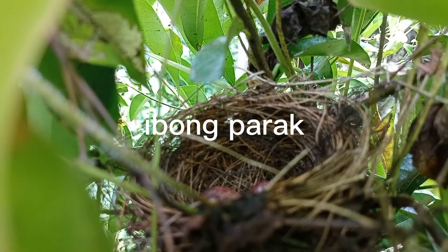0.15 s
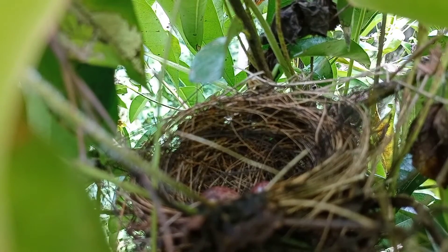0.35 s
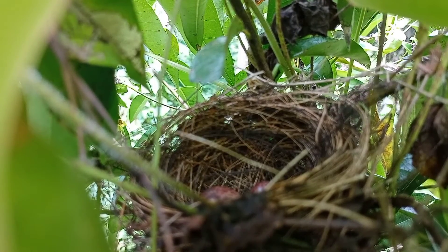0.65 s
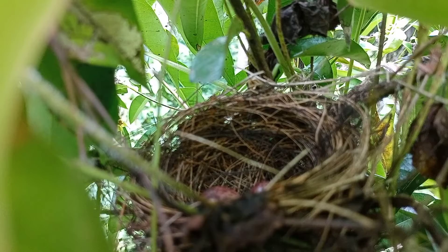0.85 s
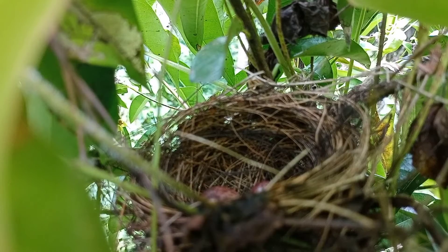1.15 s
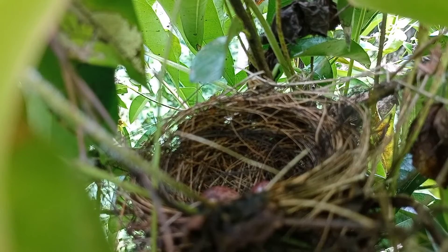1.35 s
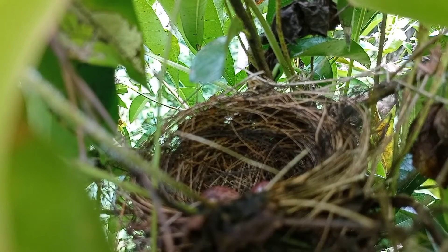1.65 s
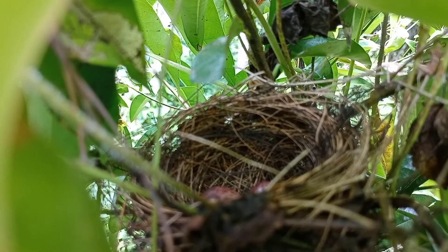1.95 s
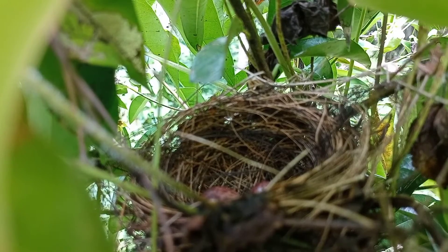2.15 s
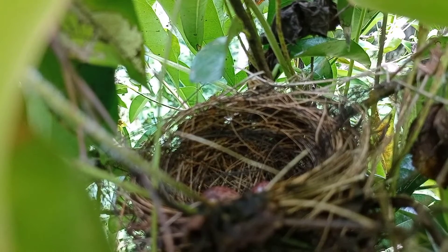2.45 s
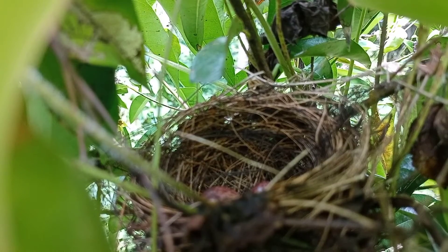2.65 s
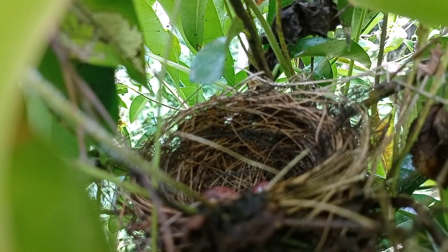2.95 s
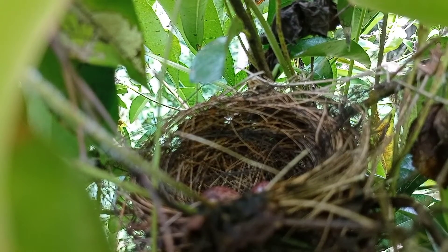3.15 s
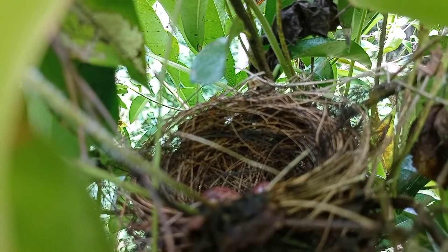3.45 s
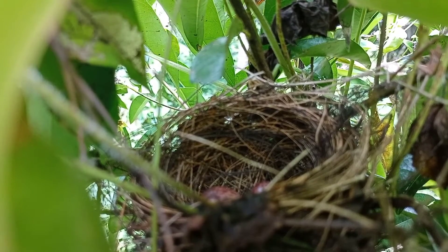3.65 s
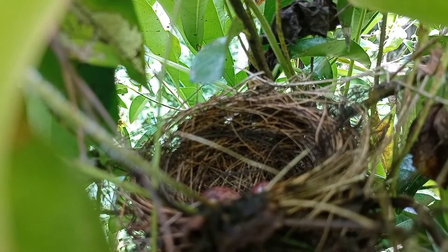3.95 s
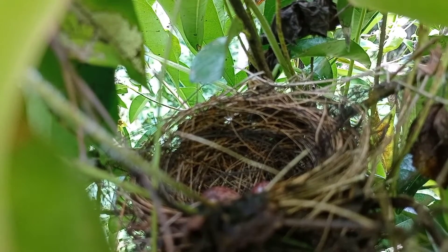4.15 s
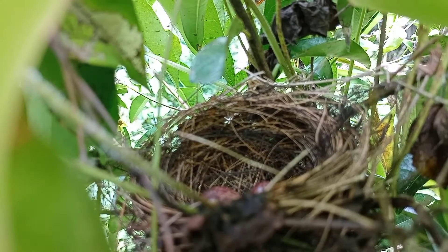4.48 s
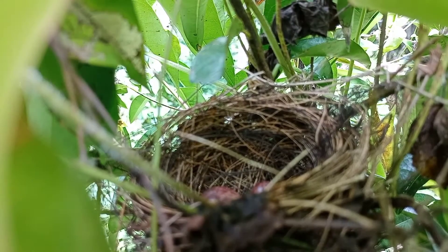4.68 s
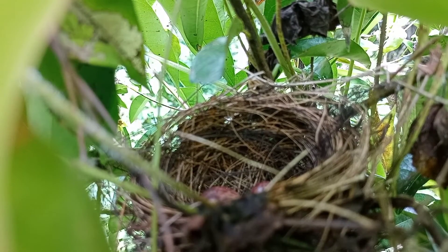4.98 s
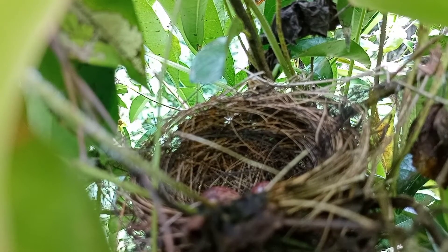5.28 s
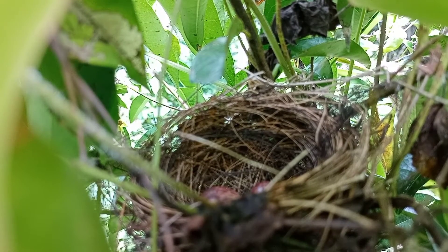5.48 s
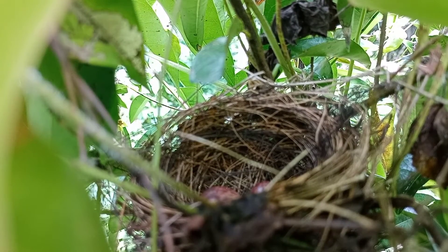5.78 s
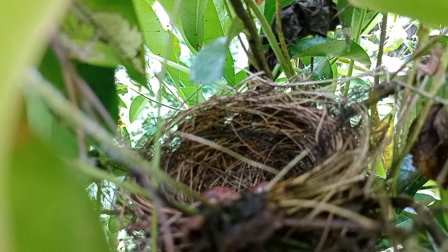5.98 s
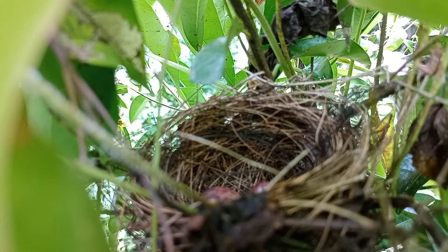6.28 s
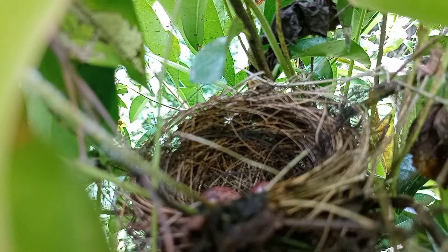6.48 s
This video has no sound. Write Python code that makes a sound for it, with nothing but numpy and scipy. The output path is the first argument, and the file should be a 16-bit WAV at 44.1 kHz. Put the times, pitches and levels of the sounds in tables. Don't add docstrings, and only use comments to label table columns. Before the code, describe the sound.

Close microphone among foliage, over a very quiet bed of distant traffic hum, airy leaf hiss and thin insect noise. Raspy bird clicks come patchily, fade, then build into rapid scolding. Leaves brush softly and twigs tick; one hard snap with a low bump follows. The chatter resumes strong and steady to the end, its tone shifting as the head turns, with a final small tick.

```python
import sys
import numpy as np
from scipy import signal
from scipy.fft import rfft, irfft, next_fast_len
from scipy.io import wavfile
from scipy.ndimage import uniform_filter1d

SR = 44100
rng = np.random.default_rng(int(sys.argv[2]) if len(sys.argv) > 2 else 0)


def magnitude_from_level(level_db):
    exponent = np.asarray(level_db, float) / 20
    return 10 ** exponent


def inscribe(sig):
    pcm = np.round(np.clip(np.atleast_2d(sig).T, -1, 1) * 32767)
    wavfile.write(sys.argv[1], SR, pcm.astype(np.int16))


N = 291942

# (f/Hz, level per Hz/dB)
BUSH_SPECTRUM = [(30, -12), (90, -13.5), (150, -1.5), (270, -14), (540, -13), (700, -19), (3300, -22.5),
                 (4800, -34), (7700, -40), (9000, -21), (10200, -43.5), (11300, -37.5), (12300, -52),
                 (15300, -40)]
BUSH_DB = -60.5
# (t/s, early effort/dB, late effort/dB, start pitch/Hz)
FAR_NOTES = [(-.05, -26, -27, 850), (.038, -29, -34, 786), (.112, -34, -40, 816), (0.19, -35.5, -38, 1096),
             (.301, -34, -33, 1100), (.41, -34, -36, 835), (.499, -32.5, -31.5, 995), (.612, -28, -35, 820),
             (.893, -31.5, -32.5, 769), (1.267, -36.5, -30.5, 760), (1.357, -31.5, -37.5, 779),
             (1.503, -42.5, -41, 912), (1.701, -43.5, -41.5, 1099), (1.794, -43.5, -42.5, 897),
             (1.953, -48.5, -40.5, 797), (2.069, -29, -31, 740), (2.267, -31.5, -33, 760),
             (2.431, -24.5, -28, 802), (2.51, -24, -28.5, 805), (2.591, -22, -18, 866),
             (2.691, -16, -17, 943), (2.777, -20.5, -23.5, 923), (2.851, -20, -21, 981),
             (2.943, -25, -22.5, 1063), (3.033, -22.5, -28, 1020), (3.141, -31.5, -29, 955),
             (3.243, -29.5, -28, 996), (3.333, -26, -28, 1034), (3.435, -26, -29, 1000)]
# (t/s, early effort/dB, late effort/dB, start pitch/Hz)
NEAR_NOTES = [(3.58, -25, -22, 1080), (3.671, -21.5, -20.5, 1000), (3.767, -17.5, -21, 1000),
              (3.848, -21, -17.5, 943), (3.986, -20.5, -19.5, 1050), (4.136, -22, -22, 975),
              (4.228, -21.5, -19.5, 891), (4.305, -22.5, -19.5, 1026), (4.501, -23.5, -21.5, 902),
              (4.685, -21.5, -20.5, 1020), (4.813, -20, -20.5, 989), (4.909, -19, -17.5, 960),
              (5.004, -19, -18, 1000), (5.134, -19.5, -13.5, 1013), (5.231, -15.5, -19, 1020),
              (5.318, -19, -15, 979), (5.446, -19, -19, 1003), (5.545, -18, -20, 980),
              (5.642, -20.5, -16.5, 894), (5.845, -20.5, -16, 940), (5.932, -18, -18, 981),
              (6.025, -18, -15.5, 1022), (6.113, -16.5, -17.5, 980), (6.219, -17, -18, 992),
              (6.307, -17, -18.5, 939)]
NOTE_S, TOP_HZ = 0.06, 1203
HOP_S = 3.52
# (t/s, length/s)
ODD_LENGTHS = [
    (.038, .056),
    (.114, 0.047),
    (1.503, 0.075),
    (1.953, .074),
    (2.591, .068),
]
# (t/s, length/s, start f/Hz, peak f/Hz, end f/Hz)
CLEAR_TONES = [
    (.322, .03, 1080, 1130, 900),
    (1.503, .079, 740, 1350, 1150),
    (2.634, .019, 1000, 1310, 800),
    (2.726, .025, 900, 1310, 880),
    (3.874, .034, 1000, 1150, 1230),
    (5.878, .026, 1020, 1110, 1200),
]
ARCH_PEAK = 0.55
# (t/s, beak gape level/dB, turned-away level/dB, raised level/dB)
HEAD = [(.04, -5.5, 7, -2), (.16, 9.5, 10.5, 4), (.44, 4, 7.5, -5), (.58, -8, 4.5, -3.5),
        (1.39, -10.5, 9, -2), (1.54, -1, -7, 17), (1.72, 9.5, 14, -1), (2.0, 5, 13.5, 3), (2.1, 0.5, 8, 2),
        (2.46, -7.5, 6.5, 2.5), (2.7, -7, -.5, -1.5), (2.82, -7, 5, -1), (3.2, 4, 9, 3.5),
        (3.4, -0.5, 7.5, 2), (3.6, 6.5, 6, -1), (4.4, 2, 6.5, -2), (4.97, -7.5, 7, 4), (5.4, 2, 4.5, 0.5)]
# (f/Hz, level/dB)
THROAT = [(300, -38.5), (650, -23.5), (1000, -13.5), (1600, -7.5), (2200, -1.5), (3550, -11.5), (4900, -48),
          (6000, -32), (7700, -36.5), (8800, -31.5), (10300, -46.5), (12600, -44.5), (13700, -34.5),
          (15300, -28)]
BAND_EDGES_HZ = [1500, 2700, 4700, 11000]
HISS_DB, HISS_PER_TURN, HISS_PER_GAPE = -4, 0.93, -0.22
AIR_DB, AIR_PER_TURN, AIR_PER_GAPE = -1.6, 0.88, 0.2
ROUGH, ROUGH_PER_DB, STEADYING, SETTLING = 0.63, 0.03, 0.019, 0.1391
# (f/Hz, level/dB)
FAR_TINT = [(500, 0.6), (720, 2.5), (1150, -1.5), (1650, 2), (4000, -1), (4900, 11.5), (6500, 1),
            (12000, -.5)]
# (t/s, length/s, level/dB, f/Hz)
WHISTLES = [
    (0.11, 0.25, -52, 3430),
    (3.933, 0.038, -51, 3320),
    (4.059, 0.07, -58.5, 3406),
    (4.393, 0.051, -67, 3347),
]
# (t/s, rustle level/dB, rumble level/dB, dying time
# t60/s)
BRUSHES = [(.2, -62, -56, 0.98), (1.55, -72, -61, 0.43), (1.78, -70, -56.5, .5), (1.922, -54.5, -54, .3),
           (1.955, -49, -57, .5), (2.0, -46, -63, 0.13), (2.1, -53, -53, 0.34), (3.513, -37.5, -42, .05),
           (3.525, -43.5, -49.5, 0.43), (3.544, -22.5, -30, 0.051), (3.556, -39, -37.5, .3),
           (3.6, -48.5, -50, .4), (3.648, -45, -63, 0.061), (3.77, -66, -51, 0.68)]
BRUSH_RISE_S = 0.0072
# (f/Hz, level per Hz/dB)
LEAVES = [(240, -32), (400, -9), (1810, -11.5), (2910, -16), (3340, -7.5), (5470, -27.5), (7670, -30),
          (9080, -21.5), (11800, -36.5), (15800, -28)]
# (f/Hz, level per Hz/dB)
CAMERA_BODY = [(40, -42), (100, -3.5), (190, -1), (350, -11.5), (800, -38.5), (3000, -50.5)]
# (t/s, peak level/dB, thump level/dB)
TICKS = [(1.8806, -39, -50), (1.9154, -50, -62), (1.9215, -45, -57), (1.953, -60, -37),
         (2.1374, -36.5, -49), (3.5137, -24, -36), (3.541, -8.5, -26), (3.5458, -12, -42),
         (3.5488, -15, -13), (6.5161, -19.5, -40), (6.6016, -30, -53)]
# (f/Hz, level per Hz/dB)
TWIG = [(300, -29), (850, -5.5), (1600, -10.5), (3000, 2.5), (5600, -30), (8000, -45), (9000, -17),
        (10200, -48), (14700, -38)]
EDGE_HZ = 15600


def evened(x):
    return x / np.sqrt(np.mean(x ** 2) + 1e-20)


def read(points, hz):
    f, value = np.transpose(points)
    return np.interp(np.log(hz + 1), np.log(f + 1), value)


def colour(x, points):
    size = next_fast_len(len(x))
    gain = magnitude_from_level(read(points, np.fft.rfftfreq(size, 1 / SR)))
    return irfft(rfft(x, size) * gain, size)[:len(x)]


def wander(top_hz):
    return evened(signal.lfilter(*signal.butter(2, top_hz, fs=SR), rng.standard_normal(N)))


def add(mix, s, sound):
    part = mix[round(s * SR):][:len(sound)]
    part += sound[:len(part)]


def series(*columns):
    return np.array(columns).T.ravel()


def hum():
    turns = np.cumsum(150 * (1 + 0.0401 * wander(top_hz=2.8))) / SR
    return magnitude_from_level(-67.5 + 2.9 * wander(top_hz=4)) * np.sin(2 * np.pi * turns)


def bush():
    frames, hz = N // 256 + 5, np.fft.rfftfreq(1024, 1 / SR)
    a, b, patches = rng.standard_normal((frames, 513, 3)).T
    patches = uniform_filter1d(patches, size=20, axis=0)
    patches = evened(uniform_filter1d(patches, size=20, axis=1))
    z = (a + 1j * b) * magnitude_from_level(read(BUSH_SPECTRUM, hz)[:, None] + 1.2 * patches)
    air = signal.istft(z, nperseg=1024, noverlap=768)[1][:N]
    return magnitude_from_level(BUSH_DB) * evened(air)


def breath_effort(t, start, end, early_db, late_db):
    length = end - start
    when = series(start - .016, start - .0003, start + .0046, start + .25 * length,
                  start + .7 * length, end - .009, end, end + .013)
    shape_db = series(early_db - 44, early_db - 11.5, early_db - 1.5, early_db,
                      late_db + .6, late_db - 1.62, late_db - 10.0, late_db - 31.5)
    order = np.argsort(when)
    rims = series(start - .03, start - .017, end + .014, end + .02)
    shut = np.interp(t, rims, np.tile([1., 0, 0, 1], len(start)))
    return np.interp(t, when[order], shape_db[order]) - 40 * shut


def membranes(t, start, pitch_hz, rough):
    turns = np.cumsum(pitch_hz * (1 + 0.095 * rough * wander(top_hz=116.54))) / SR
    chaos = wander(top_hz=245.3) + 1j * wander(top_hz=234)
    chaos /= abs(chaos) ** 0.69
    drive = np.zeros(N)
    for k in range(1, 5):
        swing = 1 - rough + rough * np.roll(chaos, 9000 * k)
        drive += (swing * np.exp(2j * np.pi * (k * turns + k * k / 7))).real
    breath = rng.standard_normal(N)
    lag = rng.integers(14, 34, len(start))[np.searchsorted(start - .02, t) - 1]
    drive = evened(drive) + .2 * (breath + .8 * breath[np.arange(N) - lag])
    return drive * (1 + 0.33 * rough * wander(top_hz=356))


def head_turns(t, voice, open_db):
    s, *columns = np.transpose(HEAD)
    gape_db, turn_db, raised_db = (np.interp(t, s, c) for c in columns)
    hiss_db = HISS_DB + HISS_PER_TURN * turn_db + HISS_PER_GAPE * gape_db + raised_db
    air_db = AIR_DB + AIR_PER_TURN * turn_db + AIR_PER_GAPE * gape_db + raised_db
    gains_db = [turn_db, 0 * t, gape_db + 0.05 * open_db, hiss_db + 0.31 * open_db, air_db + .3 * open_db]
    size = next_fast_len(N)
    spectrum = rfft(voice, size)
    band = np.searchsorted(BAND_EDGES_HZ, np.fft.rfftfreq(size, 1 / SR))
    heard = np.zeros(N)
    for k, gain_db in enumerate(gains_db):
        share = uniform_filter1d(1. * (band == k), size=1500)
        heard += magnitude_from_level(gain_db) * irfft(spectrum * share, size)[:N]
    return heard


def bird():
    t = np.arange(N) / SR
    start, early_db, late_db, first_hz = np.transpose(FAR_NOTES + NEAR_NOTES)
    length = NOTE_S + 0 * start
    for s, odd in ODD_LENGTHS:
        length[np.argmin(abs(start - s))] = odd
    end = start + length
    effort_db = breath_effort(t, start, end, early_db, late_db)
    plateau_db = np.interp(t, start + length / 2, late_db)
    open_db = effort_db - plateau_db
    pitch_hz = np.interp(t, series(start, end), series(first_hz, TOP_HZ + 0 * start))
    rough = ROUGH + ROUGH_PER_DB * (plateau_db + 19.5)
    steadied = series(0 * start, SETTLING + STEADYING * (late_db - early_db))
    rough -= np.interp(t, series(start + .3 * length, start + .7 * length), steadied)
    rough = np.clip(np.maximum(rough, .42) - 0.01866 * open_db, 0, 1)
    for s, held, *arch_hz in CLEAR_TONES:
        locked = (t > s) & (t < s + held)
        pitch_hz = np.where(locked, np.interp((t - s) / held, [0, ARCH_PEAK, 1], arch_hz), pitch_hz)
        rough = np.where(locked, .33, rough)
    drive = membranes(t, start, pitch_hz, rough)
    voice = colour(drive * magnitude_from_level(effort_db), THROAT) / np.std(colour(drive, THROAT))
    heard = head_turns(t, voice, open_db)
    return np.where(t < HOP_S, colour(heard, FAR_TINT), heard)


def foliage(x):
    t = np.arange(SR // 3) / SR
    taps = rng.standard_normal(len(t)) * magnitude_from_level(-60 * t / 0.09) * (t > .004)
    return signal.fftconvolve(x, taps / np.linalg.norm(taps))[:N]


def whistles():
    out, waver, flutter = np.zeros(N), wander(top_hz=80), wander(top_hz=90)
    for s, length, db, hz in WHISTLES:
        count = round(length * SR)
        turns = np.cumsum(hz * (1 + .014 * waver[round(s * SR):][:count])) / SR
        add(out, s, magnitude_from_level(db) * np.sin(2 * np.pi * turns) * signal.windows.tukey(count, .4))
    return out * (1 + .55 * flutter)


def brushing():
    t, out = np.arange(N) / SR, np.zeros(N)
    grains = rng.standard_normal(N) * magnitude_from_level(0.93 * wander(top_hz=300))
    rustle = evened(colour(grains, LEAVES))
    rumble = evened(colour(rng.standard_normal(N), CAMERA_BODY))
    for s, rustle_db, rumble_db, t60 in BRUSHES:
        rise = np.clip(1 + (t - s) / BRUSH_RISE_S, 0, 1) ** 2
        touch = rise * magnitude_from_level(-60 * np.maximum(t - s, 0) / t60)
        out += touch * (magnitude_from_level(rustle_db) * rustle + magnitude_from_level(rumble_db) * rumble)
    return out


def ticks():
    t, cracks, pushes = np.arange(1500) / SR, np.zeros(N), np.zeros(N)
    crack_fade = magnitude_from_level(-60 * t / 0.0063) + 0.033 * magnitude_from_level(-60 * t / 0.055)
    push = np.sin(2 * np.pi * 420 * t) * magnitude_from_level(-60 * t / 0.0092)
    for s, peak_db, thump_db in TICKS:
        add(cracks, s, magnitude_from_level(peak_db) * rng.standard_normal(1500) * crack_fade)
        add(pushes, s, magnitude_from_level(thump_db - 1.0) * push)
    return magnitude_from_level(5) * colour(cracks, TWIG) + pushes


def scene():
    near = bird()
    echoes = magnitude_from_level(-25.5) * foliage(near)
    return (hum() + bush() + near + echoes + whistles() + brushing() + ticks())[None]


def top_cut(x):
    return signal.sosfilt(signal.butter(12, 16610, fs=SR, output="sos"), x)


def record(dry):
    dry = signal.lfilter(*signal.butter(2, 70, "high", fs=SR), dry)
    band_limit = signal.firwin(511, EDGE_HZ, window=("kaiser", 9), fs=SR)
    mix = signal.oaconvolve(dry, band_limit[None], "same")
    return top_cut(mix)


dry = scene()
out = record(dry)
inscribe(out)
```